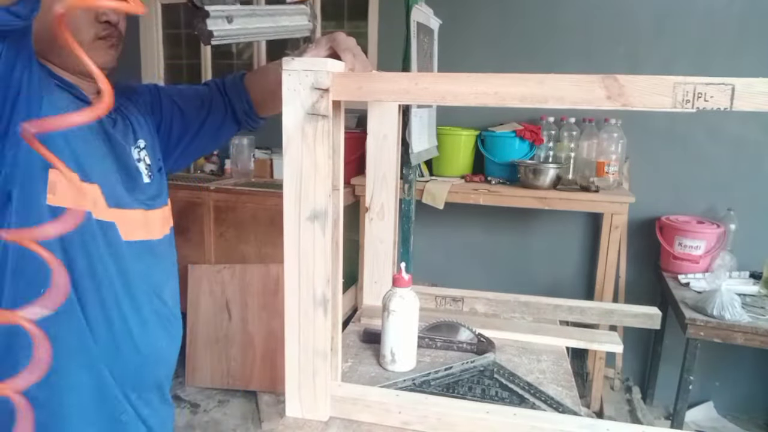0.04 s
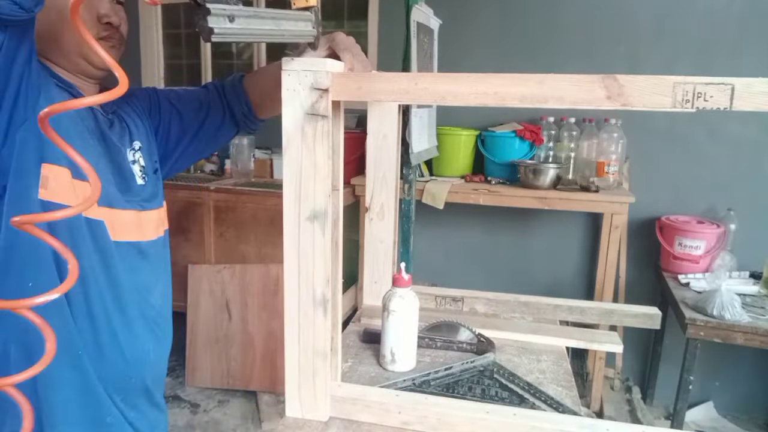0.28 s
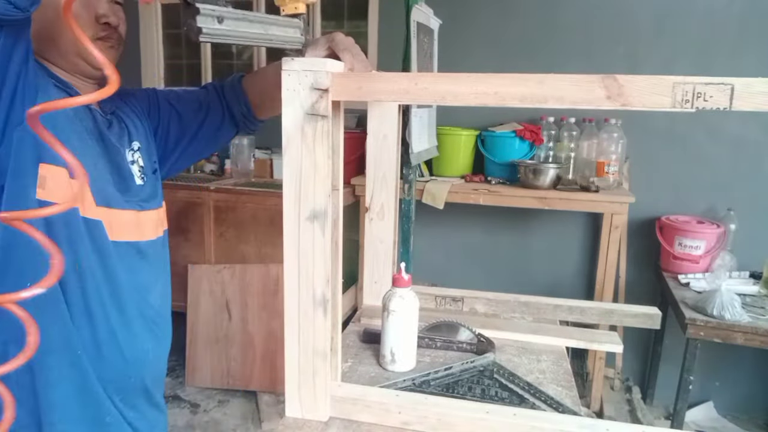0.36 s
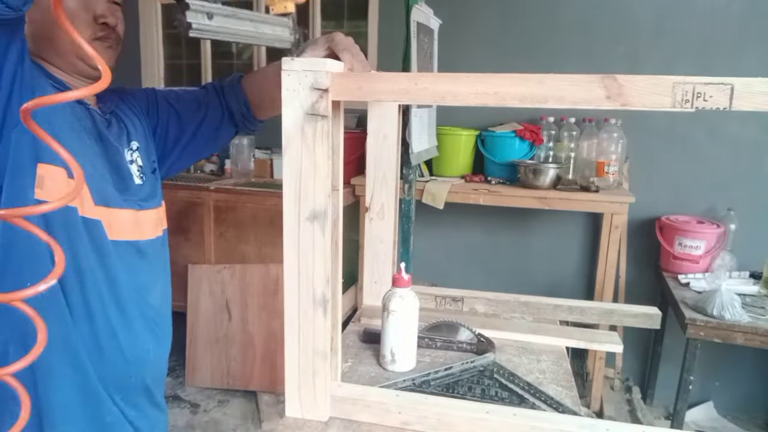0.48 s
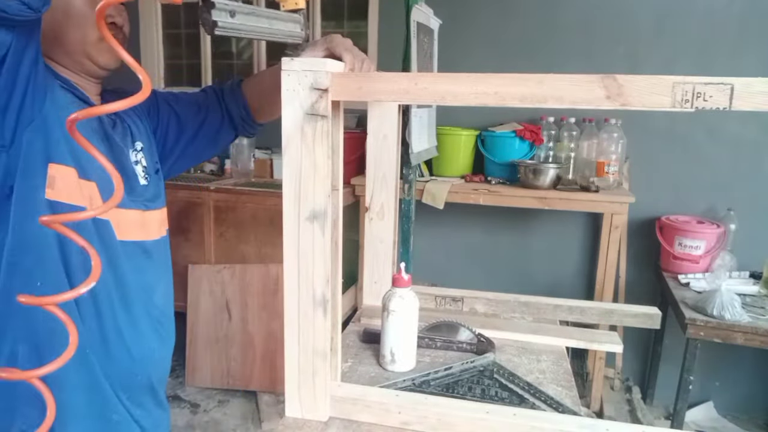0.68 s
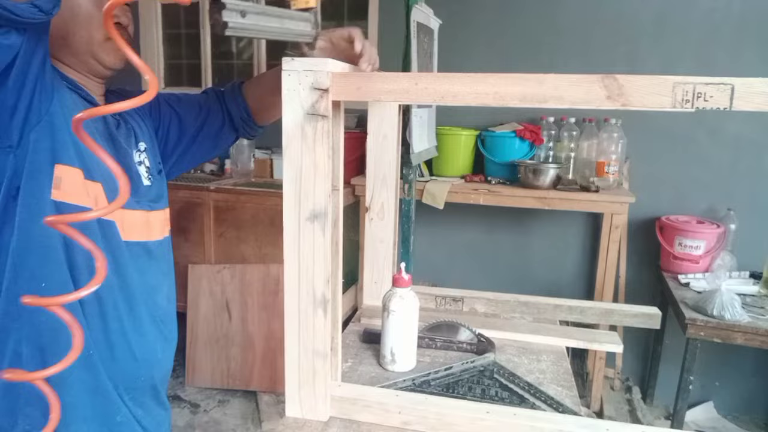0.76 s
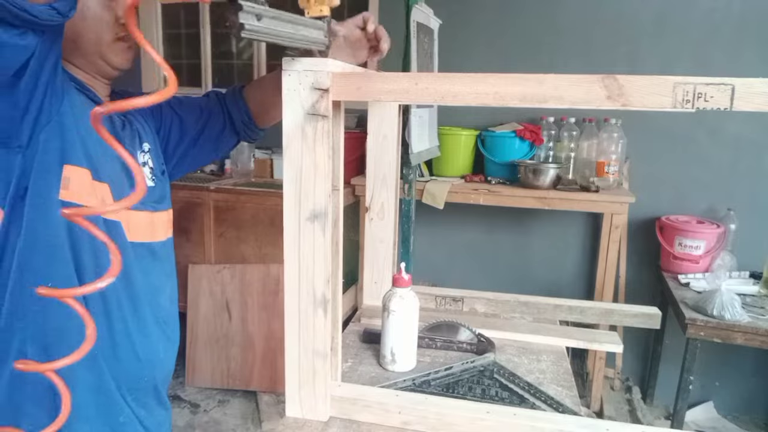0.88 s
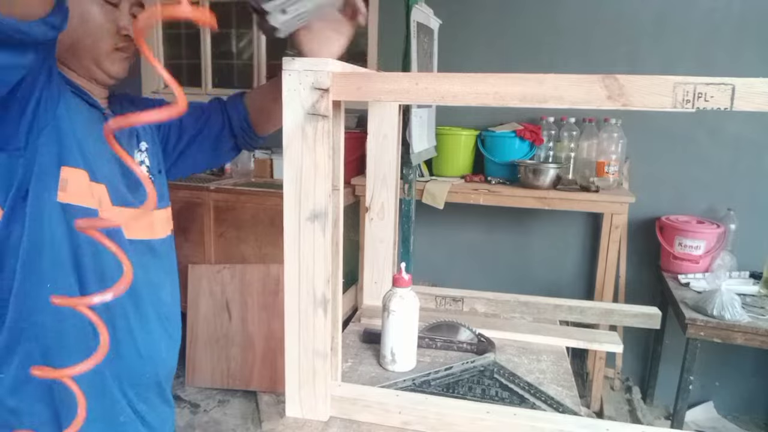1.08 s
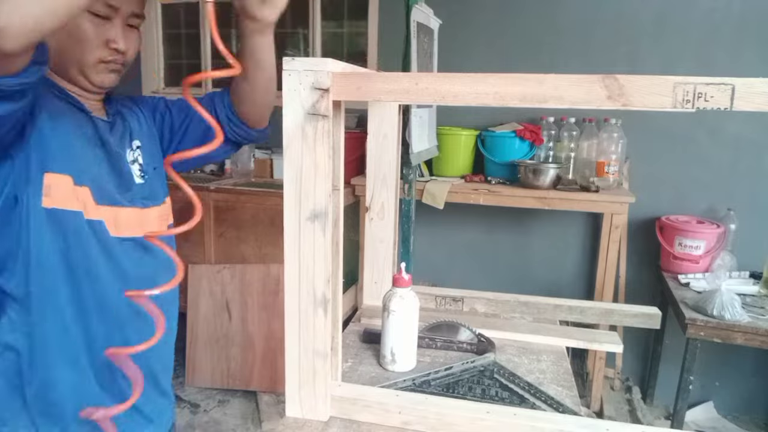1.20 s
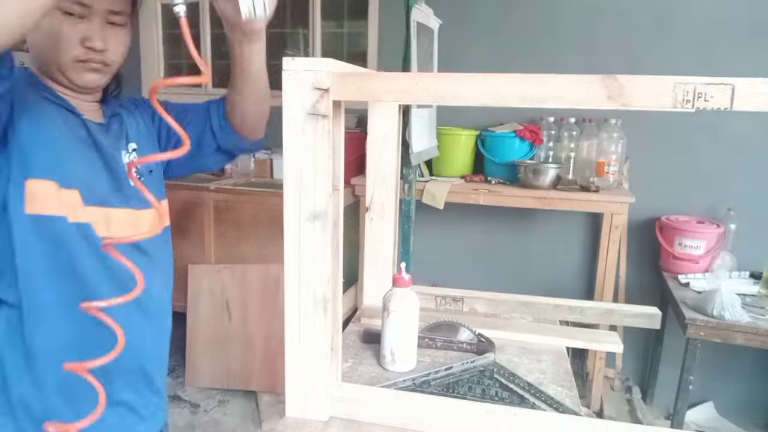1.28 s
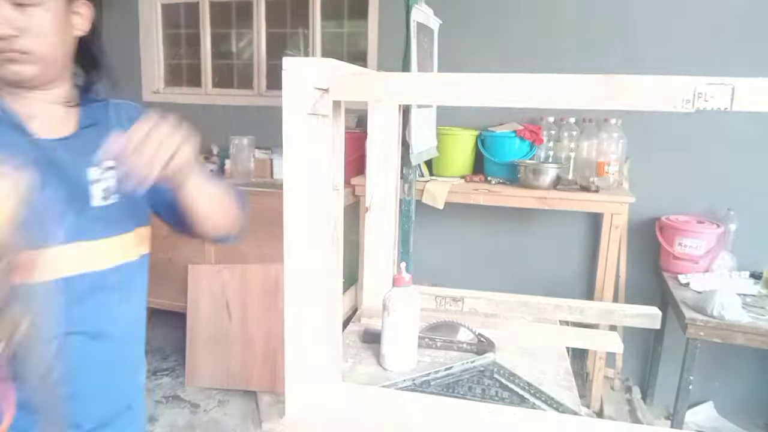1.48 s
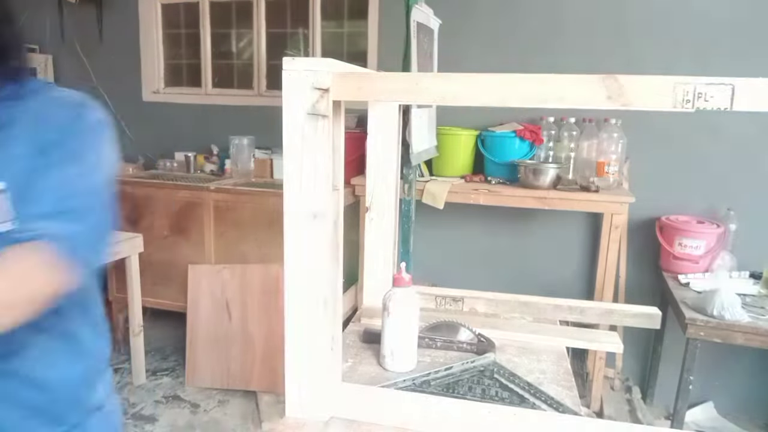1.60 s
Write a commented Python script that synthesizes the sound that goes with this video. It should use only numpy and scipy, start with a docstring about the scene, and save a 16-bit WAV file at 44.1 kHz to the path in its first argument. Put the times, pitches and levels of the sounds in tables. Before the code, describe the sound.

A pneumatic nail gun drives six nails in quick succession into a wooden frame, each crack followed by an air puff; then faint taps, a scraping clack and soft squeaks, close in a small humming workshop.

```python
"""A low hum fills a small workshop; it is steady coloured noise. After a soft bump and light taps,
a pneumatic nailer fires six nails into a wooden frame. Each shot is a burst of quick contacts with a crack
that rings the frame, then a puff of exhaust: air noise with a soft recoil. A few metal clicks follow puffs.
Later come faint clinks and taps; the tool is lifted off with a scrape (grainy noise) and a two-part clack.
Last, two overlapping squeaks sag in pitch, over a faint rub of soft noise."""
import sys
import numpy as np
from scipy import signal
from scipy.fft import rfft, irfft, next_fast_len
from scipy.io import wavfile
from scipy.ndimage import uniform_filter1d

SR = 44100
rng = np.random.default_rng(int(sys.argv[2]) if len(sys.argv) > 2 else 0)


def pcm_store(signal):
    """Save signal as 16-bit PCM."""
    levels = np.round(np.clip(np.atleast_2d(signal), -1, 1) * 32767)
    wavfile.write(sys.argv[1], SR, levels.astype(np.int16).T)


N = 72765  # length in samples

# Rise and fall times below are the times to climb or drop by 60 dB; t60 is the time to die away by 60 dB.
# background hum: loudness over time [t/s, level/dB]
HUM_LEVEL = [(0, -60), (.15, -60.5), (1.0, -54.5), (1.2, -55.5), (1.5, -56), (1.65, -61)]
# background hum: how strong each pitch region is [f/Hz, level/dB]
HUM_SPECTRUM = [(30, -15), (70, -8), (140, 6), (220, -6), (330, -0.5), (470, -14.5), (600, -5),
                (850, -14.5), (1100, -12.5), (1260, -1.5), (1420, -21), (2500, -22), (4200, -29),
                (7200, -30), (8300, -40.5), (15000, -40)]
# how long the room rings at each frequency, after its early reflections [f/Hz, t60/s]
ROOM_DECAY = [(150, .22), (450, 0.39), (1200, 0.14), (2500, 0.12), (7000, 0.12), (14000, 0.046)]
# tone colour of the room's answer [f/Hz, level/dB]
ROOM_COLOUR = [(100, -17.5), (300, 2.5), (500, -0.5), (750, -0.5), (1200, -0.5), (2000, 0), (4000, 2),
               (7200, -0.5), (8500, -2), (15000, -13)]

# squeaks [t/s, f/Hz, level/dB, rise/s, fall/s, drop per overtone/dB]
SQUEAKS = [(1.553, 1263, -42, 0.117, 0.074, -28.5), (1.567, 1145, -39, 0.043, 0.077, -13)]
# colour of the hiss with the squeaks [f/Hz, level/dB]
SQUEAK_HISS_SPECTRUM = [(1000, -24), (3000, -6), (7000, 4.5), (8300, -1), (11000, -7.5), (15000, -6.5)]
# colour of soft rubbing, also used for the squeaks' rasp [f/Hz, level/dB]
RUB_SPECTRUM = [(300, -19), (1000, -10.5), (1300, 2.5), (1750, 2), (2050, -11), (2600, -22), (7000, -39),
                (15000, -55)]

# metal clicks of piston and magazine [t/s, level/dB]
CLICKS = [(0.3186, -20.5), (0.458, -24), (0.7943, -32.5), (1.3308, -17), (1.3649, -27.5)]
# colour of a metal click [f/Hz, level/dB]
METAL_SPECTRUM = [(120, -53.5), (200, -22), (681, -29.5), (1240, -10), (1760, -16), (3460, 0.5), (4160, -8),
                  (5370, 1.5), (6330, -11.5), (7200, 7), (8030, -17), (9470, -4), (15800, -17)]
# ringing tones (modes) of the tool's steel [f/Hz, level/dB, t60/s]
STEEL_MODES = [(2410, -3.5, .09), (3030, -10, .08), (3455, -3, 0.11), (3540, -4, 0.11), (4590, -1, 0.058),
               (5390, 2, 0.1), (5770, -3, .08), (7000, -13, 0.091), (7340, -0.5, .1), (9200, -9, .07),
               (10700, -12, .07)]
# faint clinks of loose parts [t/s, f/Hz, level/dB]
CLINKS = [(1.05, 2530, -58.5), (1.055, 1850, -55.5), (1.057, 3000, -58), (1.072, 4830, -65),
          (1.075, 5900, -62), (1.222, 5940, -73)]
# light taps of the tool on the wood [t/s, level/dB, rise/s]
TAPS = [(0.1907, -50.5, 0.0034), (0.196, -52, 0.07), (1.059, -57, .01), (1.148, -61, .02),
        (1.223, -60, 0.0073)]
# colour of a tap [f/Hz, level/dB]
TAP_SPECTRUM = [(100, 3), (300, 5), (700, -1.5), (1250, -5), (1600, -5.5), (3000, -9.5), (5500, -8.5),
                (7500, -20), (9000, -32), (15000, -40)]
# soft bumps against the frame [t/s, level/dB, t60/s]
BUMPS = [(0.189, -37.5, 0.036), (.622, -27.5, 0.031), (1.328, -39, .04)]
# the tool scraping off the frame [t/s, level/dB, rise/s, fall/s]
SCRAPES = [(1.26, -43.5, 0.019, 0.1), (1.288, -32, 0.056, 0.035), (1.298, -31, .03, 0.048),
           (1.33, -31.5, .07, 0.13), (1.365, -40.5, 0.018, 0.074)]
# colour of the scrape [f/Hz, level/dB]
SCRAPE_SPECTRUM = [(120, -77), (200, -45.5), (372, -16), (517, -49), (599, -16), (981, -4.5), (1100, -23.5),
                   (1270, 9.5), (1490, -20), (1830, -4.5), (2230, -8), (2490, -1.5), (2890, -9),
                   (3590, -2.5), (4310, -14.5), (7200, -11.5), (8030, -35), (10400, -25), (15800, -42)]
# brighter hiss around the clack [t/s, level/dB, rise/s, fall/s]
SPITS = [(1.326, -32, 0.074, 0.13), (1.369, -36, 0.07, .075)]

# air escaping as the valve opens for a shot [t/s, level/dB, rise/s, fall/s]
LEAKS = [(0.249, -22, 0.043, 0.099), (.3915, -19, 0.031, 0.012), (.509, -19, 0.028, 0.073),
         (0.635, -22, 0.036, 0.064)]
# exhaust puffs [t/s, burst level/dB, swell level/dB, swell rise/s, recoil level/dB, recoil lead/s, thud level/dB]
PUFFS = [(0.314, -30.5, -20, 0.086, -34.5, .001, -38), (0.4534, -18.5, -21, 0.092, -21, 0.0065, -27.5),
         (0.5712, -23, -21.5, 0.075, -25, .01, -30.5), (0.69, -18.5, -22, 0.089, -27, 0.0034, -43.5),
         (.789, -19.5, -23.5, .10, -23.5, 0.0027, -30.5), (0.885, -18.5, -23, 0.08, -26.5, 0.0036, -53)]
# colour of rushing air [f/Hz, level/dB]
AIR_SPECTRUM = [(59, -37.5), (100, -6), (259, -8), (556, -13.5), (1220, 2), (1440, 3), (1780, -7.5),
                (2350, 1.5), (2780, -3), (4250, -4.5), (5480, 0.5), (6220, -3), (7060, 1.5), (7530, -2.5),
                (8190, -10), (9500, -3.5), (11300, -5.5), (12000, -4.5), (13900, -13.5), (14800, -5),
                (15800, -9.5)]
# colour of the tool's kick against the wood [f/Hz, level/dB]
THUD_SPECTRUM = [(60, -23.5), (130, -6), (350, 0.5), (600, -7), (1000, -4.5), (3000, -32.5)]

# shots [t/s, blow level/dB, crack level/dB, ring level/dB, thump level/dB]
SHOTS = [(0.249, -4, -21.5, -20, -32.5), (0.3895, -8.5, -19, -21.5, -33), (.5240, -4.5, -22.5, -21, -36.5),
         (0.6341, -1.5, -21, -23.5, -32), (0.7366, 0, -20.5, -20.5, -35.5), (0.8334, 1, -19, -21, -38.5)]
# contacts within one blow [delay/s, level/dB]
CONTACTS = [(0, -7), (.0034, 2.5), (.0043, 2.5), (.0072, -3)]
# resonances of the struck nail and board [f/Hz, width/Hz, level/dB]
BOARD = [(950, 110, -7.5), (1160, 92, 4), (1940, 500, 2), (3500, 1400, -13.5), (6600, 1500, -21.5)]
# colour of the crack [f/Hz, level/dB]
CRACK_SPECTRUM = [(88, -42), (150, -7.5), (598, -11.5), (1050, 0.5), (1280, -2.5), (1650, -8.5), (2040, -8),
                  (3390, -8), (5100, -9), (6200, -9), (6700, -3), (8150, -23), (10700, -14.5), (13800, -33),
                  (15800, -23)]
# ringing tones (modes) of frame and tool [f/Hz, level/dB, t60/s]
FRAME_MODES = [(739.5, -17, 0.18), (845.4, -12, .13), (940, -15, 0.084), (1027, -12, 0.18),
               (1244, 2.5, 0.15), (1274, -1.5, 0.087), (1530, -18.5, 0.17), (1735, -17, .15),
               (1790, -13, 0.31), (2150, -14.5, 0.22), (2154, -10, .17), (2600, -15.5, 0.18)]

# Settings; the unit is the end of each name.
ROOM_DELAY_S, ROOM_HOLD_S = 0.009, 0.018  # early reflections stay level during the hold
BLOW_WET_DB, AIR_WET_DB, SMALL_WET_DB = -7.5, -11.5, -21.5  # how much room is added
SQUEAK_HISS_DB, SQUEAK_RASP_DB = -70, -11
SQUEAK_HOLD_S, SQUEAK_SAG_HZ_PER_S = 0.0069, 900
SQUEAK_JITTER = 0.0116  # random pitch change, as a fraction
RUB_S, RUB_DB, RUB_RISE_S, RUB_HOLD_S, RUB_FALL_S = 1.431, -48, 0.39, 0.02, 0.21
CLICK_HOLD_S, CLICK_FALL_S, CLICK_STEEL_DB = 0.00082, 0.03, -12
CLINK_T60_S, TAP_FALL_S = 0.083, 0.03
SCRAPE_GRAIN_PER_S, SCRAPE_ROUGH_DB = 650, 3
SCRAPE_FRAME_DB, SCRAPE_STEEL_DB = -21, -9.5  # ringing relative to each scrape
BURST_RISE_S, BURST_HOLD_S, BURST_FALL_S = 0.008, 0.0091, 0.036
PUFF_HOLD_S, PUFF_FALL_S = 0.0091, 0.14
RECOIL_HZ, RECOIL_T60_S = 135, 0.025
THUD_LAG_S, THUD_FALL_S = 0.0042, 0.036
FRAME_HZ, FRAME_T60_S = 152, 0.16
BLOW_DB, CRACK_HOLD_S, CRACK_FALL_S = 9.5, 0.0072, 0.035
CEILING, LOW_CUT_HZ, TOP_HZ = 0.6, 109, 15700  # ceiling is a sample value
GATE_DB, GATE_KNEE_DB, GATE_DEPTH_DB, GATE_WINDOW_S = -47, 4.5, 3, 0.012


def amp(db):
    """Turn decibels into a multiplying gain."""
    return 10 ** (np.asarray(db) / 20)


def unit(x):
    """Scale a signal to an average strength (rms) of 1."""
    return x / np.sqrt(np.mean(x ** 2) + 1e-20)


def along(points, hz):
    """Read a (frequency, value) curve, with frequency on a log axis as in hearing."""
    f, v = np.transpose(points)
    return np.interp(np.log(hz + 1), np.log(f + 1), v)


def since(s):
    """Seconds since time s, for each sample; negative before it."""
    return np.arange(N) / SR - s


def filtered(x, response):
    """Multiply each frequency in x by a response, which may be complex."""
    m = next_fast_len(N + SR // 10, real=True)  # spare silence at the end
    hz = np.fft.rfftfreq(m, 1 / SR)
    return irfft(rfft(x, m) * response(hz), m)[:N]


def noise(spectrum):
    """Random hiss coloured by a spectrum, scaled to rms 1."""
    white = rng.standard_normal(N)
    return unit(filtered(white, lambda hz: amp(along(spectrum, hz))))


def swell(s, rise, hold, fall):
    """A loudness curve that rises by 60 dB up to time s, holds, then falls by 60 dB."""
    t = since(s)
    rising = np.maximum(-t, 0) / rise
    falling = np.maximum(t - hold, 0) / fall
    return amp(-60 * (rising + falling))


def tone(s, hz, t60):
    """A sine wave that starts at time s and dies away, like one mode of a struck object."""
    out, start = np.zeros(N), round(s * SR)
    t = np.arange(min(int(1.3 * t60 * SR), N - start)) / SR
    out[start:start + len(t)] = np.sin(2 * np.pi * hz * t) * np.exp(-np.log(1000) * t / t60)
    return out


def ring(s, modes):
    """A struck object's modes sound together, a little different in level, pitch and start each time."""
    out = np.zeros(N)
    for hz, db, t60 in modes:
        gain = amp(db + rng.normal(0, 0.78))
        start = s + rng.random() / hz  # up to one cycle late
        out += gain * tone(start, hz * (1 + rng.normal(0, 0.0028)), t60)
    return out


def wobble(rate):
    """A random curve of straight lines between random points, rate points a second."""
    knots = rng.standard_normal(4096)
    return np.interp(since(0) * rate, np.arange(len(knots)), knots)


def grainy(rate, depth_db):
    """An uneven gain of rms 1, like a rough surface passing by."""
    return unit(amp(depth_db * wobble(rate)))


def room(x, wet_db):
    """Add the workshop's short answer: noise that dies away at its own speed in each frequency band."""
    hz, t, z = signal.stft(rng.standard_normal(SR // 4), SR, nperseg=256)
    decay = np.exp(-np.log(1000) * np.maximum(t - ROOM_HOLD_S, 0) / along(ROOM_DECAY, hz)[:, None])
    colour = amp(along(ROOM_COLOUR, hz))[:, None]
    tail = signal.istft(z * decay * colour, SR, nperseg=256)[1]
    tail = np.pad(tail / np.linalg.norm(tail), (int(ROOM_DELAY_S * SR), 0))
    return x + amp(wet_db) * signal.fftconvolve(x, tail)[:N]


def hum():
    """The low background of the workshop: coloured noise that slowly changes in level."""
    level_db = np.interp(since(0), *np.transpose(HUM_LEVEL))
    return amp(level_db) * noise(HUM_SPECTRUM)


def squeak():
    """Two overlapping squeaks: wavering tones with overtones that sag in pitch, plus rasp and faint hiss."""
    out = amp(SQUEAK_HISS_DB) * noise(SQUEAK_HISS_SPECTRUM) * swell(SQUEAKS[-1][0], 0.4, 0.01, 0.14)
    for s, hz, db, rise, fall, overtone_db in SQUEAKS:
        waver = 1 + SQUEAK_JITTER * wobble(340)
        pitch_hz = (hz - SQUEAK_SAG_HZ_PER_S * since(s)) * waver
        phase = 2 * np.pi * np.cumsum(pitch_hz) / SR
        note = sum(amp(overtone_db * k) * np.sin((k + 1) * phase) for k in range(4))
        rasp = amp(SQUEAK_RASP_DB + overtone_db / 4) * noise(RUB_SPECTRUM)
        out += amp(db) * swell(s, rise, SQUEAK_HOLD_S, fall) * (note + rasp)
    return out


def rub():
    """A faint rub: soft noise that slowly swells and fades."""
    return amp(RUB_DB) * noise(RUB_SPECTRUM) * swell(RUB_S, RUB_RISE_S, RUB_HOLD_S, RUB_FALL_S)


def taps_and_bumps():
    """Light taps are short noises on the wood; soft bumps are low damped tones of the frame."""
    tap_level = sum(amp(db) * swell(s, rise, 0.001, TAP_FALL_S) for s, db, rise in TAPS)
    bumps = sum(amp(db) * tone(s, FRAME_HZ, t60) for s, db, t60 in BUMPS)
    return noise(TAP_SPECTRUM) * tap_level + bumps


def clinks():
    """Loose parts clink: each is one faint damped tone."""
    return sum(amp(db) * tone(s, hz, CLINK_T60_S) for s, hz, db in CLINKS)


def scrapes():
    """Rubbing off the frame makes grainy noise and also rings the frame and the tool's steel."""
    level = sum(amp(db) * swell(s, rise, 0, fall) for s, db, rise, fall in SCRAPES)
    out = noise(SCRAPE_SPECTRUM) * grainy(SCRAPE_GRAIN_PER_S, SCRAPE_ROUGH_DB) * level
    for s, db, rise, fall in SCRAPES:
        out += amp(db + SCRAPE_FRAME_DB) * ring(s, FRAME_MODES)
        out += amp(db + SCRAPE_STEEL_DB) * ring(s, STEEL_MODES)
    return out


def spits():
    """Brighter hiss around the clack: air noise in two swells."""
    return noise(AIR_SPECTRUM) * sum(amp(db) * swell(s, rise, 0, fall) for s, db, rise, fall in SPITS)


def clicks():
    """Metal parts meet: a very short noise, then the steel rings on."""
    level = sum(amp(db) * swell(s, 0.0057, CLICK_HOLD_S, CLICK_FALL_S) for s, db in CLICKS)
    steel = sum(amp(db + CLICK_STEEL_DB) * ring(s, STEEL_MODES) for s, db in CLICKS)
    return noise(METAL_SPECTRUM) * level + steel


def handling():
    """All small sounds of handling the tool share one light room answer."""
    small_sounds = rub() + taps_and_bumps() + clinks() + scrapes() + spits() + clicks()
    return room(small_sounds, SMALL_WET_DB)


def leaks():
    """Air escapes as the valve opens: noise that swells up to a shot and fades."""
    out = np.zeros(N)
    for s, db, rise, fall in LEAKS:
        out += room(amp(db) * noise(AIR_SPECTRUM) * swell(s, rise, 0, fall), AIR_WET_DB)
    return out


def exhaust():
    """Exhaust air swells to a short burst, while the recoil gives a low tone and a soft noisy thud."""
    out = np.zeros(N)
    for s, burst_db, swell_db, rise, recoil_db, lead, thud_db in PUFFS:
        burst = amp(burst_db) * swell(s, BURST_RISE_S, BURST_HOLD_S, BURST_FALL_S)
        slow_swell = amp(swell_db) * swell(s, rise, PUFF_HOLD_S, PUFF_FALL_S)
        flow = np.hypot(burst, slow_swell)  # adds their powers
        recoil = amp(recoil_db) * tone(s - lead, RECOIL_HZ, RECOIL_T60_S)
        thud = amp(thud_db) * noise(THUD_SPECTRUM) * swell(s + THUD_LAG_S, 0.047, 0.002, THUD_FALL_S)
        out += room(flow * noise(AIR_SPECTRUM) + recoil + thud, AIR_WET_DB)
    return out


def board(f):
    """The struck nail and board answer most strongly near their own resonances."""
    return -sum(amp(db) * 1j * f * width / (centre * centre - f * f + 1j * f * width)
                for centre, width, db in BOARD)


def shots():
    """The driver slams the nail home: quick contacts on the board, a crack, ringing and a low thump."""
    out = np.zeros(N)
    for s, blow_db, crack_db, ring_db, thump_db in SHOTS:
        contacts = np.zeros(N)  # one-sample impulses
        for delay, db in CONTACTS:
            hit_s = s + delay * rng.normal(1, 0.04)
            contacts[round(hit_s * SR)] += amp(BLOW_DB + blow_db + db)
        crack_shape = swell(s + 0.00033, 0.0078, CRACK_HOLD_S, CRACK_FALL_S)
        crack = amp(crack_db) * noise(CRACK_SPECTRUM) * crack_shape
        out += room(filtered(contacts, board) + crack, BLOW_WET_DB)
        out += amp(ring_db) * ring(s, FRAME_MODES)
        out += amp(thump_db) * tone(s - 0.003, FRAME_HZ, FRAME_T60_S)
    return out


def scene():
    """All sources added together at one microphone."""
    return (hum() + squeak() + handling() + leaks() + exhaust() + shots())[None]


def record(dry):
    """The recorder rounds off peaks, cuts deep bass, turns quiet moments down and cuts the highest treble."""
    x = dry[0] / (1 + np.abs(dry[0] / CEILING) ** 4) ** (1 / 4)
    low_cut = signal.butter(N=3, Wn=LOW_CUT_HZ, btype="high", fs=SR, output="sos")
    x = signal.sosfilt(low_cut, x)
    power = np.abs(uniform_filter1d(x * x, int(GATE_WINDOW_S * SR)))
    level_db = 10 * np.log10(power + 1e-12)
    quietness = (1 - np.tanh((level_db - GATE_DB) / GATE_KNEE_DB)) / 2  # 0 when loud, 1 when quiet
    x = x * amp(-GATE_DEPTH_DB * quietness)
    # the treble fades out across 400 Hz around the top
    return filtered(x, lambda hz: np.clip((TOP_HZ - hz) / 400 + 0.5, 0, 1) ** 2)[None]


dry = scene()
out = record(dry)
pcm_store(out)
```